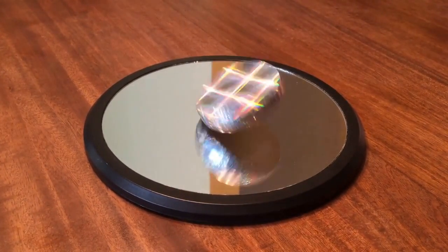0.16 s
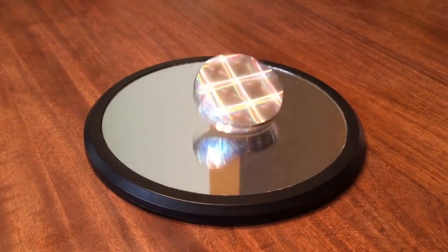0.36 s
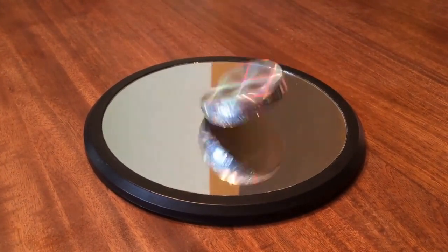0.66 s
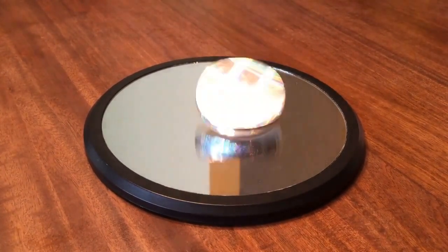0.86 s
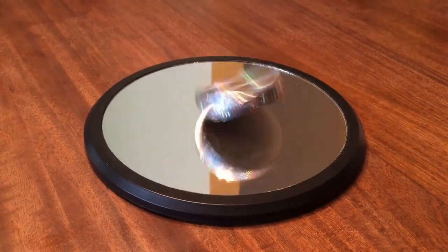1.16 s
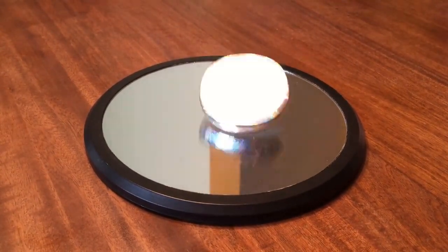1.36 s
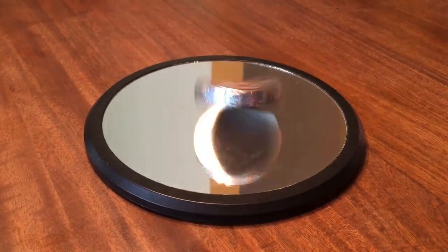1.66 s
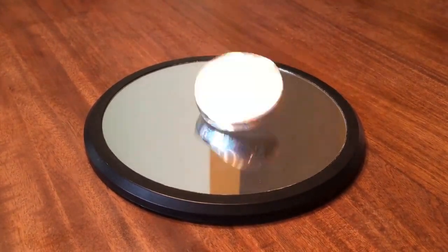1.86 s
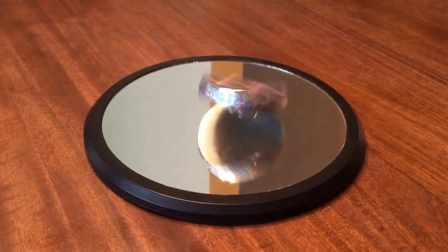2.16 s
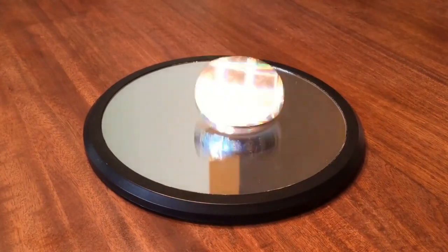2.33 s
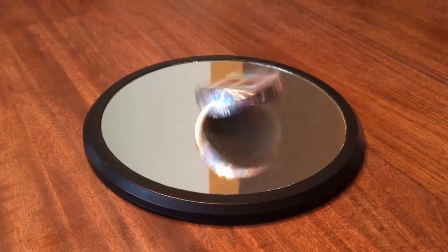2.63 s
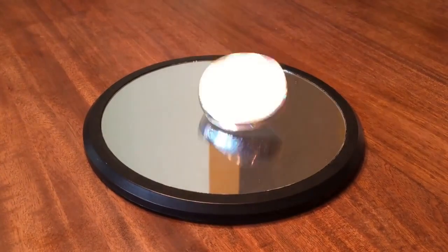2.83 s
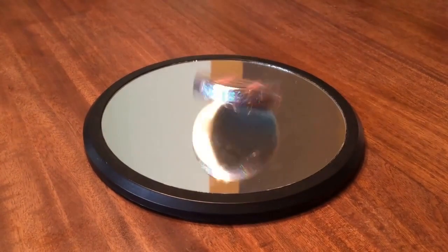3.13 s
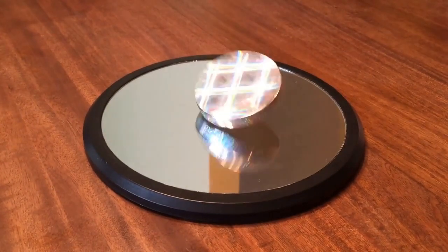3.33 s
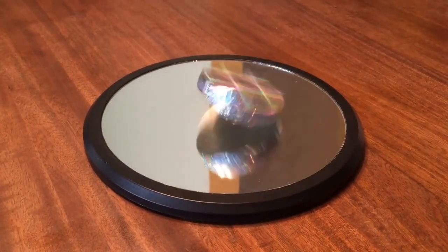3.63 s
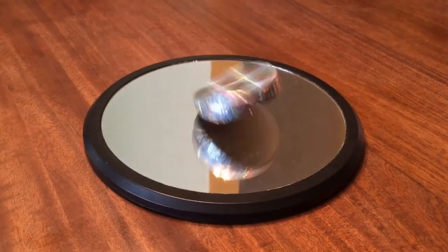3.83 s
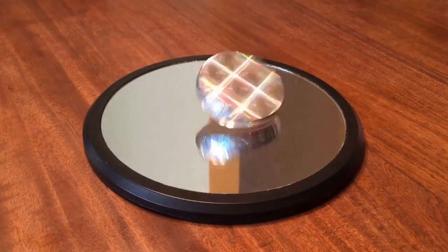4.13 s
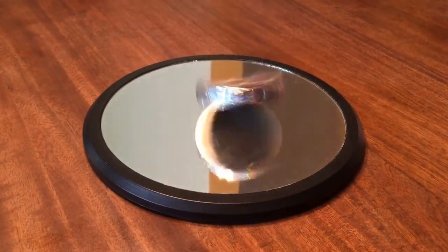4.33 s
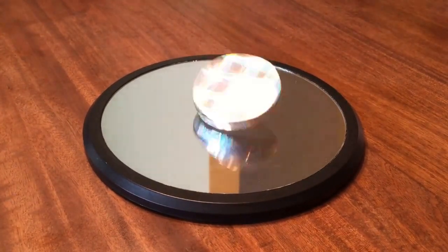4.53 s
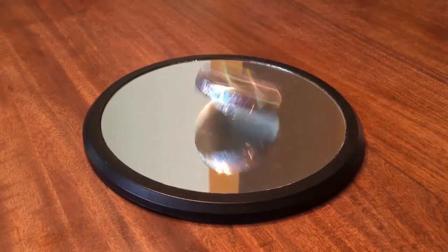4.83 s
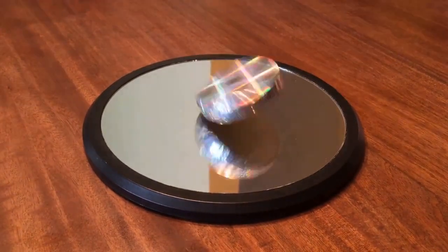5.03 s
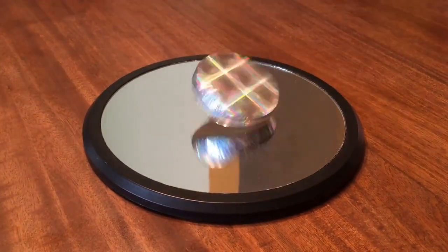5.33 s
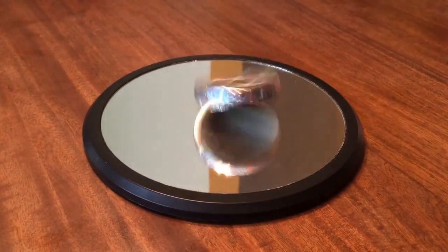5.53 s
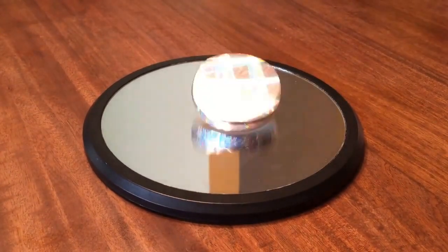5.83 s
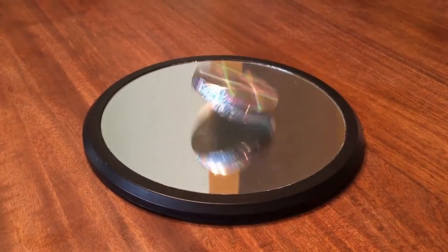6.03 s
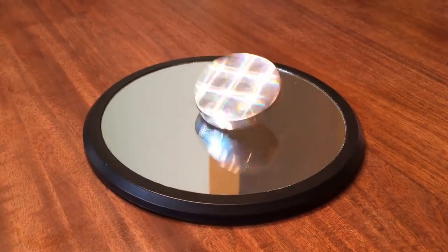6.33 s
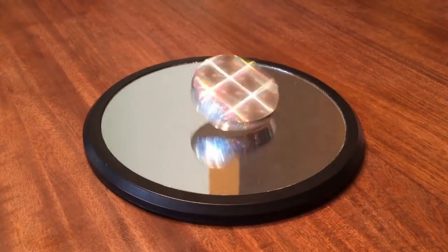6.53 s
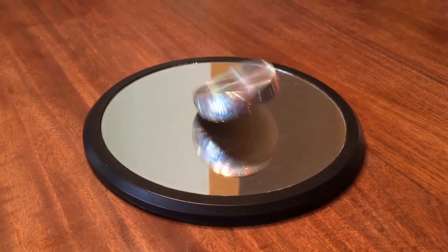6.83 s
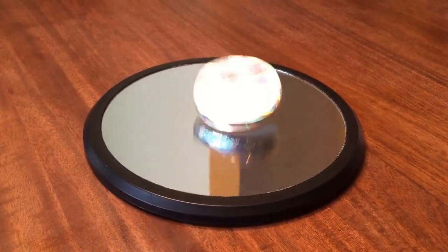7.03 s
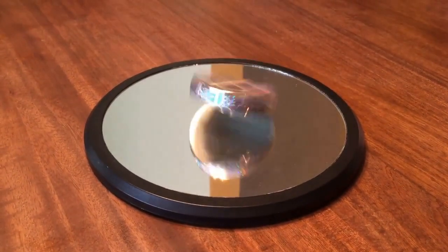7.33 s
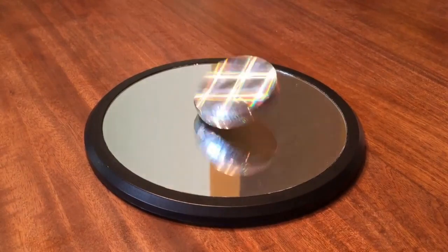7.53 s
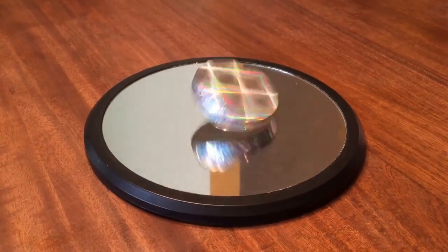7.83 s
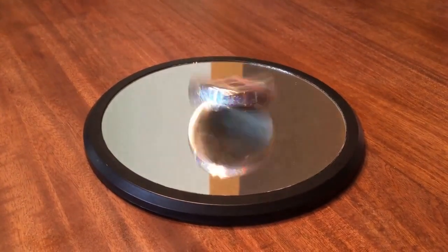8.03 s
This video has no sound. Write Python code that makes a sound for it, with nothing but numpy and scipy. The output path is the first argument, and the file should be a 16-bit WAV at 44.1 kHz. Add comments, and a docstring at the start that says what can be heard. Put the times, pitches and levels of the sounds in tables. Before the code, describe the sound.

From 0 s a heavy steel disc is already spinning on edge on a concave glass mirror on a wooden table, heard close in a small living room with short reflections. The rolling is continuous: a grainy metallic grind pulsing about seven times a second, each lap holding a tick, a tiny rattle of pits and a blunt thump. Hollow glassy ringing swells about eight times a second in quick upward whirrs. Beneath are wooden rumble and a wavering low drone. Irregular ticks and knocks stand out, clearer near 0.3, 1.6, 2.05 and 4.0 s, with the hardest clack at about 4.35 s and another at 5.3 s. The regular tick sharpens until about 6.3 s; the grind hardens between 5.9 and 7 s. The pace quickens only slightly, and the disc is still whirring at about 8 s.

```python
"""A heavy steel disc spins on edge on a concave mirror that stands on a wooden table in a living room.
From the start its contact point laps the rim about seven times a second and circles the glass about eight times;
a nick, pits and a flat spot strike on every lap, and the glass modes and gliding resonances ring in rising whirrs.
The table rumbles, a low drone comes and goes, and single ticks and knocks, weak to hard, stand out from the rest.
The lapping and circling quicken, the nick ticks louder up to 6.3 s, and the grind hardens from 5.9 to 7 s."""
import sys
import numpy as np
from scipy import signal
from scipy.fft import rfft, irfft
from scipy.io import wavfile

SR = 44100
rng = np.random.default_rng(int(sys.argv[2]) if len(sys.argv) > 2 else 0)


def wrap_up_sound(samples):
    """Save the sound to the file named by the first command line argument, as 16-bit audio."""
    columns = np.atleast_2d(samples).T
    # keep every value between -1 and 1, then stretch to whole-number steps
    tamed = np.clip(columns, -1, 1)
    steps = np.round(tamed * 32767).astype(np.int16)
    wavfile.write(sys.argv[1], SR, steps)


N = 360738
TIME = np.arange(N) / SR


# ring modes of mirror and disc: (pitch [Hz], width [Hz], relative level [dB per Hz], swell once a circle [dB],
# loudest at [turn], lobes round the circle [count], lobe depth [dB], lobe at [turn])
MIRROR_MODES = [(665, 21, -74, -9, 1, 2, -7, 0.26), (685.2, 36.5, -55.5, -1.6, 0.45, 2, 3.3, 0.29),
                (746, 46, -59, 5, 0.69, 2, 5, 0.453), (869, 110, -72, 9.5, 0.7, 2, 4, 0.34),
                (951.5, 29, -56.5, 2, 0.66, 2, -2.5, 0.7), (990, 46, -58.5, 1.3, 0.53, 3, -2.7, 0.032),
                (1035, 63, -60, 1.7, 0.97, 3, -0.3, 0.32), (1109.7, 65, -53, 0.3, 0.72, 3, -1.1, 0.17),
                (1343, 144, -77, 13, 0.82, 2, 1, 0.19), (1483, 140, -59.5, 1.3, 0.62, 2, 2, 0.32),
                (1612, 81, -65.5, 6, 0.59, 2, 6, 0.17), (1760, 103, -61.5, 6, 0.57, 3, 5.5, 0.088),
                (1861, 81, -62, 3, 0.55, 2, 6, 0.071), (1973, 155, -72.5, 2, 0.77, 3, 7.5, 0.35),
                (2321, 225, -72.5, 6, 0.63, 2, 6.5, 0.37), (3028, 440, -79.5, 5.5, 0, 3, 4, 0.041),
                (3332, 122, -72.5, 9, 0.58, 2, 4.5, 0.29), (3590, 470, -77.5, 0.3, 0.24, 3, 4.7, 0.13),
                (4076, 223, -71, 3, 0.88, 2, 1.3, 0.084), (4430, 383, -71, 3, 0.7, 3, 2.9, 0.2),
                (5410, 470, -81.5, 2, 0.72, 2, 6.5, 0.231), (5740, 260, -90.5, 3, 0.69, 2, 11, 0.109),
                (6510, 580, -75.5, 3.5, 0.75, 2, 1.0, 0.071), (7160, 400, -81.5, 2, 0.86, 2, 6, 0.011),
                (8260, 1700, -88.5, 5.5, 0.79, 3, 3.2, 0.31), (9710, 760, -87.5, 3, 0.0, 2, 2.0, 0.052),
                (11280, 460, -91, 4.5, 0.63, 2, 7, 0.308), (11960, 840, -100.5, 11.7, 0.61, 2, -0.1, 0.336),
                (13100, 430, -100.5, -7, 0.1, 2, 4, 0.105)]
# pitch at which long ripples, short ripples and grit each sound: [Hz]
RIPPLE_HZ = [760, 1235, 4430]
MODE_SCATTER_DB = 1.0  # each mode answers a little differently on every circle
STRIKE_WIDTH = .75  # width of a struck mode, as a share of its width when rolled on


def mirror(lap, circle, bumps, strikes):
    """Rolling and blows drive the modes; each swells and fades as the contact crosses its lobes."""
    long_ripples, short_ripples, grit = rim_roughness(lap)
    grind_db = grind(lap, circle)
    # a harder grind brings out each size of ripple to its own degree
    drives = [
        long_ripples * from_db(0.13 * grind_db - 6.0),
        short_ripples * from_db(1.1 * grind_db - 1.5),
        grit * from_db(0.18 * grind_db - 0.66),
    ]
    out = np.zeros(N)
    for k, (hz, width_hz, db, swell_db, swell_turn, lobes, lobe_db, lobe_turn) in enumerate(MIRROR_MODES):
        # each mode listens to the sizes of ripple that sound nearest its pitch
        shares = [np.interp(np.log(hz), np.log(RIPPLE_HZ), row) for row in np.eye(len(drives))]
        force = bumps * sum(share * drive for share, drive in zip(shares, drives) if share)
        place_db = swell_db * np.cos(2 * np.pi * (circle - swell_turn))
        place_db += lobe_db * np.cos(2 * np.pi * lobes * (circle - lobe_turn))
        place_db += MODE_SCATTER_DB * np.interp(circle, np.arange(100), rng.standard_normal(100))
        # neighbouring modes roll with opposite sign
        rolling = (-1) ** k * resonate(force, hz, width_hz)
        # a blow starts all modes at once and in step, which gives its sharp edge
        struck = from_db(-1.28) * resonate(strikes, hz, STRIKE_WIDTH * width_hz, order=1)
        out += from_db(db + place_db) * (rolling + struck)
    # the small plate radiates little below its first mode
    return signal.sosfilt(signal.ellip(6, .5, 45, 626, "high", fs=SR, output="sos"), out)


# resonances that glide up once a circle:
# (pitch [Hz], width [Hz], relative level [dB per Hz], loudest at [turn], rise [Hz per turn])
GLIDES = [(1533, 73, -61.5, 0.286, 870), (1705, 104, -52.5, 0.651, 670), (2025, 45, -67.5, 0.68, 260),
          (2195, 103, -64, 0.024, 480), (2468, 200, -67, 0.57, 180), (3475, 169, -64, 0.58, 180),
          (6870, 180, -88, 0.39, 1561)]


def glides(lap, circle, strikes):
    """Resonances that rise in pitch as they swell and fade, each once a circle: the whirr of the disc."""
    rolling = asperities(lap, repeat=0.47, spread_db=5.5) * rim_roughness(lap)[1]
    force = from_db(-3.5) * rolling + from_db(-1.0) * strikes
    out = np.zeros(N)
    for hz, width_hz, db, turn, rise_hz in GLIDES:
        past = (circle - turn + .5) % 1 - .5  # turns past the loudest place
        carrier = np.exp(2j * np.pi * np.cumsum(hz + rise_hz * past) / SR)
        r = np.exp(-np.pi * width_hz / SR)
        # shift the moving pitch down to zero, smooth there, and shift back
        smoothed = signal.lfilter([(1 - r) ** 2], [1, -2 * r, r * r], force / carrier)
        ringing = 2 * np.real(carrier * smoothed)
        out += from_db(db) * np.cos(np.pi * past) ** 2 * ringing
    return out * np.sqrt(SR / 2)


# average speed of the contact point along the rim: (time [s], speed [laps per s])
LAP_RATE = [(0, 6.7657), (1.5, 6.8497), (3.5, 7.0008), (6.5, 7.117), (8.18, 7.2646)]
START_TURN = .2622
# the disc sways once a lap, and the side it sways to creeps round the rim
SWAY_TURNS, SWAY_CYCLE_S, SWAY_START_S = .0205, 6.416, 1.81
SWAY_LOAD_DB, SWAY_LOAD_TURN = 1.03, 0.28  # swing of the load, and how far past that side it peaks


def contact():
    """Laps run on the rim, and load in dB: the sway hurries and presses the contact on a creeping side."""
    even = START_TURN + np.cumsum(in_time(LAP_RATE)[0]) / SR
    side = (TIME - SWAY_START_S) / SWAY_CYCLE_S
    lap = even - SWAY_TURNS * (np.cos(2 * np.pi * (even - side)) - np.cos(2 * np.pi * side))
    load_db = SWAY_LOAD_DB * np.cos(2 * np.pi * (lap - side - SWAY_LOAD_TURN))
    return lap, load_db


# speed of the contact point round the glass: (time [s], speed [circles per s])
CIRCLE_RATE = [(0, 8.116), (8.18, 8.45956)]


def circling():
    """Circles run on the glass: the speed added up over time."""
    return np.cumsum(in_time(CIRCLE_RATE)[0]) / SR


# roughness round the rim: (place [turn], long ripples [dB], short ripples [dB], grit [dB])
RIM = [(0.005, 5.5, 7.5, 4.5), (0.098, 0, -2, 3.5), (.19, 1.5, -1.5, 4.5), (.27, 1.5, 5.5, 6.5),
       (.35, 0, 3, 7), (.44, 8, 2.5, 8.5), (.5, -6, -1.5, 5.5), (0.572, 8, -1.5, 4.5), (.61, 10, -4, 2.5),
       (.655, 11, -2, 6.5), (.71, 8, -8, 2), (.81, 2.5, -1, 3), (.9, 1.5, -8, 2.5), (.98, -2, -3.5, 3)]


def rim_roughness(lap):
    """Gain of each size of ripple under the contact point."""
    turn, *columns = np.transpose(RIM)
    return [from_db(np.interp(lap, turn, c, period=1)) for c in columns]


# slow trend of how hard the rim grinds: (time [s], level [dB])
GRIND = [(0, -1), (5.9, -1), (7, 0), (8.18, 0)]
# the swell peaks when the circle is this many turns ahead of the lap
GRIND_SWELL_DB, GRIND_SWELL_TURN = 1.4, 0.88
GRIND_SCATTER_DB = 2.5  # from lap to lap


def grind(lap, circle):
    """Pressure on the rim in dB: a slow trend, a swell at the beat of lap and circle, and chance per lap."""
    trend_db, = in_time(GRIND)
    chance = rng.standard_normal(int(lap[-1]) + 2)
    swell_db = GRIND_SWELL_DB * np.cos(2 * np.pi * (circle - lap - GRIND_SWELL_TURN))
    return trend_db + swell_db + GRIND_SCATTER_DB * np.interp(lap, np.arange(len(chance)), chance)


def asperities(lap, repeat, spread_db):
    """Tiny bumps: a share of their power returns every lap, the rest is new, and their heights vary."""
    size = SR // 7
    on_rim = rng.standard_normal(size)[(lap * size).astype(int) % size]
    on_glass = rng.standard_normal(N)
    # a new height every 32 samples
    heights = from_db(spread_db * np.repeat(rng.standard_normal(N // 32 + 1), 32)[:N])
    return rms_one(heights * (np.sqrt(repeat) * on_rim + np.sqrt(1 - repeat) * on_glass))


# tick of the nick at turn 0 of the rim, before load and mix: (time [s], level [dB])
NICK = [(0, 3), (2.3, 6.5), (3.3, 8.5), (4.2, 8.5), (5.3, 9.5), (6.3, 10), (8.18, 7.5)]


def nick(lap, circle, load_db):
    """The nick in the rim hits the glass on every lap with a short, sharp tick."""
    level_db = in_time(NICK)[0] + load_db
    hits = once_a_lap(lap, circle, 0, level_db, swell_db=2.0, swell_turn=0.25, scatter_db=1.0)
    return from_db(-2.0) * blows(hits, chatter_s=0.0011, chatter=0.44)


# small pits in the rim, before load and scatter: (place [turn], tick level [dB], thump level [dB])
PITS = [(0.273, 0.5, 1.5), (.311, -0.5, -2.5), (.349, 4.5, -2.5), (.403, -1.5, 4.5), (.431, -17, 3.5),
        (.49, -10, -15), (.569, -12.5, 0), (.643, -5, 1), (.741, -5.5, -5)]
PIT_SCATTER_DB = 2.8  # from lap to lap


def pits(lap, load_db):
    """The small pits tick and thump one after another, a short rattle on every lap."""
    ticks, thumps = 0, 0
    for turn, tick_db, thump_db in PITS:
        at = crossings(lap, turn)
        db = load_db[at] + PIT_SCATTER_DB * rng.standard_normal(100)[:len(at)]
        force = blows(np.column_stack([TIME[at], db]), chatter_s=.0013, chatter=0.4)
        ticks = ticks + from_db(tick_db) * force
        thumps = thumps + from_db(thump_db) * force
    return ticks, thumps


# thump of the flat spot, before load and mix: (time [s], level [dB])
FLAT_SPOT = [(0, 10), (1.2, 3), (2.3, 10), (5.1, 8.5), (8.18, 12)]
FLAT_TURN = .717  # where the flat spot lies on the rim


def flat_spot(lap, circle, load_db):
    """The flat spot lands on every lap with a thump and a strong, longer chatter."""
    level_db = in_time(FLAT_SPOT)[0] + load_db
    landings = once_a_lap(lap, circle, FLAT_TURN, level_db, swell_db=2.5, swell_turn=0.34, scatter_db=2.1)
    return from_db(0.5) * blows(landings, chatter_s=0.0047, chatter=1.35)


# single ticks and knocks of the rim, weak to hard, many of them louder strikes of the nick and pits;
# levels before the mix: (time [s], level on the glass [dB], level of the jolt [dB])
KNOCKS = [(0.085, 24, 4), (.206, 19, -8), (0.2689, 26, -13), (.458, 16, -10), (.551, 20.5, -12),
          (0.698, 16.5, -17), (.821, 21, -10), (.884, 15, -10), (1.008, 22, 0), (1.050, 11, -10),
          (1.6197, 27.5, 6), (1.8886, 20, -14), (2.0507, 25.5, 7), (2.6376, 19, -14), (2.736, 16, -12),
          (2.785, 14, -6), (2.929, 21, -10), (3.122, 14, -8), (3.356, 8, -10), (3.859, 15, -12),
          (3.9908, 24.5, 13), (4.3475, 26, 0), (4.3535, 26, 20.5), (4.463, 14, -10), (4.507, 18, -10),
          (4.697, 9, -13), (4.735, 12, -10), (4.9815, 23, -9), (5.074, 20, -3), (5.160, 8, -10),
          (5.302, 26, 4), (5.4063, 17, -7), (5.644, 11, -8), (5.8665, 11, -6), (6.0072, 12, -12),
          (6.338, 19, -10), (6.624, 18.5, -8), (6.754, 12, -10), (6.850, 16, -10), (7.130, 14, -12),
          (7.546, 13, -7)]


def knocks():
    """Single ticks and knocks of the rim: each a chattering blow on the glass and a jolt of its own level."""
    rows = np.array(KNOCKS)
    on_glass = from_db(-10.5) * blows(rows[:, [0, 1]], chatter_s=0.005, chatter=0.79)
    jolts = blows(rows[:, [0, 2]], chatter_s=0.007, chatter=1.1)
    return on_glass, jolts


def snags(lap, per_s, spread_db):
    """Specks on the rim catch at random, mostly in the rough stretch, and make the rolling grainy."""
    roughness = rim_roughness(lap)[1]
    caught = rng.random(N) < per_s * roughness ** 2 / SR
    heights = from_db(spread_db * np.clip(rng.standard_normal(N), -2, 2)) * rng.choice([-1, 1], N)
    return rms_one(caught * heights)


# plain hiss of the contact, before grit and load: (pitch [Hz], relative level [dB per Hz])
HISS = [(30, -98), (60, -83.5), (300, -80), (560, -115), (900, -78.5), (2000, -77), (2700, -91.5),
        (3600, -86), (5000, -86.5), (6500, -88), (10000, -94), (15000, -112)]


def hiss(lap):
    """Broad contact noise between the modes, following the grit on the rim."""
    hz, db = np.transpose(HISS)
    colour = from_db(np.interp(np.log(np.fft.rfftfreq(N, 1 / SR) + 1), np.log(hz), db))
    noise = irfft(rfft(rng.standard_normal(N)) * colour, N) * np.sqrt(SR / 2)
    return noise * rim_roughness(lap)[-1]


# reflections between disc and glass, sweeping once a circle:
# (delay [s], swing [s], longest at [turn], gain [factor])
SWEEPS = [(.000835, .000046, .528, .145), (.001042, .000055, .175, .047), (.001344, .00004, .934, .094)]


def sweep(x, circle):
    """The wedge of air under the tilted disc turns and adds short echoes of gliding delay."""
    out = x
    for delay_s, swing_s, turn, gain in SWEEPS:
        moving_s = delay_s + swing_s * np.cos(2 * np.pi * (circle - turn))
        out = out + gain * np.interp(TIME - moving_s, TIME, x)
    return out


def flutter(x, circle):
    """The tilted disc beams its treble round the table; the echo draws a moving comb through the hiss."""
    delay_s = .0023 + .00013 * np.cos(2 * np.pi * circle)
    return x + .42 * np.interp(TIME - delay_s, TIME, thin(x, corner_hz=2300))


# valleys between the modes: (pitch [Hz], width [Hz], depth [dB])
VALLEYS = [(1180, 43, -3), (1264, 65, -1.5), (2725, 100, -2), (4700, 180, -10), (4930, 110, -2),
           (5235, 165, -13), (11000, 180, -8)]


def hollow(x):
    """Cut the narrow valleys where neighbouring modes cancel, which makes the colour hollow."""
    for hz, width_hz, db in VALLEYS:
        band = resonate(x, hz, width_hz, order=1) / np.sqrt(SR / 2)
        x = x - (1 - from_db(db)) * band
    return x


# modes of base and table: (pitch [Hz], width [Hz], relative level [dB per Hz], swing once a lap [dB])
TABLE_MODES = [(89.5, 88, -89, 1), (142, 32, -62.5, 3), (183, 51, -67.5, 3.5), (273, 73, -72, 5),
               (341.4, 47, -69, 6), (375.8, 64, -68, 7), (445, 45, -75.5, 10.5), (485, 41, -77, 8.5)]


def table(lap, circle, bumps, thumps, jolts):
    """The rolling weight and its jolts shake base and table top; the load swings per lap and per circle."""
    swing = np.cos(2 * np.pi * (lap - .84))
    rolling = bumps * from_db(0.45 * np.cos(2 * np.pi * (circle - .6)) - 5.0)
    struck = from_db(-2.0) * thumps + from_db(5.5) * thin(jolts, corner_hz=330)
    out = np.zeros(N)
    for hz, width_hz, db, swing_db in TABLE_MODES:
        force = rolling * from_db(swing_db * swing) + struck
        out += from_db(db) * resonate(force, hz, width_hz)
    return out


ROOM_T60_S, ROOM_DB = 0.24, -8.5  # time to die away by 60 dB; level of the reflections


def room(x, circle):
    """Dense reflections die away; their pattern shifts as the source goes round."""
    age = np.arange(SR // 2) / SR
    fade = from_db(-60 * age / ROOM_T60_S) * (1 - np.exp(-age / 0.00042))
    tails = rng.standard_normal((4, len(age))) * fade
    wet = 0
    for k, tail in enumerate(tails):
        facing = np.maximum(np.cos(2 * np.pi * (circle - k / len(tails))), 0)
        wet = wet + signal.fftconvolve(x * facing, tail / np.linalg.norm(tail))[:N]
    return x + from_db(ROOM_DB) * wet


# partials of the drone that swell and fade:
# (time [s], level of the 4th [dB], level of the 9th [dB], level of the 8th [dB])
SWELLS = [(0, -51.5, -42.5, -54), (0.8, -50, -50.5, -53), (1.0, -44.5, -42.5, -51), (1.8, -45.5, -47, -55),
          (2.25, -45, -53.5, -71), (2.45, -57, -54.5, -59), (2.85, -65, -51, -44.5), (3.25, -56, -62, -56),
          (3.5, -45, -53.5, -60), (3.9, -61, -52.5, -60), (4.75, -59, -58, -56), (5.35, -44, -53, -61),
          (7.0, -45, -49, -59), (7.45, -42.5, -57.5, -69), (7.8, -42, -48, -66), (8.18, -42.5, -61, -69)]
# their multiples of the base pitch, in the same order: [count]
SWELLING_PARTIALS = [4, 9, 8]
DRONE_HZ = 27.1  # base pitch of those partials
# steady tones of the drone: (pitch [Hz], level at the start [dB], level at the end [dB])
STEADY_TONES = [(54.7, -70, -57), (81.4, -68, -72), (153, -52, -59.5), (162.7, -48.5, -55),
                (241.9, -61, -53), (272.3, -53, -73), (322.3, -59.5, -65.5), (377, -61, -64)]


def drone():
    """A low hum of sustained tones with slow level ramps, and three partials that come and go."""
    out = np.zeros(N)
    for k, db in zip(SWELLING_PARTIALS, in_time(SWELLS)):
        out += from_db(db) * wavering_tone(k * DRONE_HZ, width_hz=11.8, waver=0.18)
    for hz, first_db, last_db in STEADY_TONES:
        out += from_db(np.linspace(first_db, last_db, N)) * wavering_tone(hz, width_hz=6, waver=.4)
    return out


def wavering_tone(hz, width_hz, waver):
    """A sustained ring whose height and phase wander a little; rms 1."""
    # the first second, where the resonator builds up, is dropped
    wander = rms_one(resonate(rng.standard_normal(N + SR), hz, width_hz)[SR:])
    return rms_one(np.sin(2 * np.pi * hz * TIME) + waver * wander)


def crossings(lap, turn):
    """Samples at which the contact passes one turn of the rim."""
    return np.flatnonzero(np.diff(np.floor(lap - turn)) > 0)


def once_a_lap(lap, circle, turn, level_db, swell_db, swell_turn, scatter_db):
    """Blows (s, dB) of a flaw at one turn of the rim; it lands hardest on one side of the glass."""
    at = crossings(lap, turn)
    db = level_db[at] + swell_db * np.cos(2 * np.pi * (circle[at] - swell_turn))
    return np.column_stack([TIME[at], db + scatter_db * rng.standard_normal(len(at))])


def blows(rows, chatter_s, chatter):
    """Each blow is a click and a brief dying chatter; 0 dB has the energy of 5 ms of unit noise."""
    out, age = np.zeros(N + SR), np.arange(SR // 25) / SR
    for (s, db), noise in zip(rows, rng.standard_normal((len(rows), len(age)))):
        force = noise * np.exp(-age / chatter_s)
        force *= chatter / np.linalg.norm(force)
        force[0] += 1  # the click
        at = max(round(s * SR), 0)
        out[at:at + len(age)] += from_db(db) * force / np.linalg.norm(force)
    return out[:N] * np.sqrt(.005 * SR)


def resonate(x, hz, width_hz, order=2):
    """One or two like resonators in a row; unit white noise comes out at 0 dB per Hz on top."""
    r = np.exp(-np.pi * width_hz / SR)
    gain = (1 - r * r) / 2
    stage = [gain, 0, -gain, 1, -2 * r * np.cos(2 * np.pi * hz / SR), r * r]
    return signal.sosfilt([stage] * order, x + 1e-18) * np.sqrt(SR / 2)


def soften(force, corner_hz):
    """A contact of finite length drives little above its corner."""
    return signal.sosfilt(signal.butter(3, corner_hz, fs=SR, output="sos"), force + 1e-18)


def thin(force, corner_hz):
    """Take away what lies below the corner."""
    return signal.sosfilt(signal.butter(3, corner_hz, "high", fs=SR, output="sos"), force + 1e-18)


def from_db(db):
    """Decibels to gain."""
    return 10 ** (np.asarray(db) / 20)


def rms_one(x):
    """Scale to an rms of 1."""
    return x / np.sqrt(np.mean(x ** 2) + 1e-20)


def in_time(rows):
    """Each column of a curve at every sample."""
    s, *columns = np.transpose(rows)
    return [np.interp(TIME, s, c) for c in columns]


def scene():
    """The disc on its mirror, the table under it and a low drone."""
    lap, load_db = contact()
    circle = circling()
    bumps = from_db(load_db) * asperities(lap, repeat=0.31, spread_db=3.5)
    pit_ticks, pit_thumps = pits(lap, load_db)
    knock_ticks, jolts = knocks()
    ticks = pit_ticks + nick(lap, circle, load_db) + knock_ticks
    grains = from_db(-7.5) * snags(lap, per_s=110, spread_db=2.0)
    thumps = flat_spot(lap, circle, load_db)
    strikes = thin(soften(ticks + grains, corner_hz=1660), corner_hz=782)
    strikes += soften(thumps + pit_thumps, corner_hz=880)
    # the jolts also drive the high modes, the hardest most
    strikes += from_db(-9.0) * soften(thin(jolts, corner_hz=2930), corner_hz=6040)
    plate = mirror(lap, circle, bumps, strikes)
    plate += glides(lap, circle, strikes)
    plate += from_db(load_db) * hiss(lap)
    echoed = flutter(sweep(plate, circle), circle)
    disc = hollow(room(echoed, circle))
    mix = from_db(-2.0) * disc + table(lap, circle, bumps, thumps, jolts) + drone()
    return mix[None]


def record(dry):
    """The top is cut steeply above 15300 Hz."""
    return signal.sosfilt(signal.ellip(10, .2, 80, 15300, fs=SR, output="sos"), dry)


dry = scene()
out = record(dry)
wrap_up_sound(out)
```